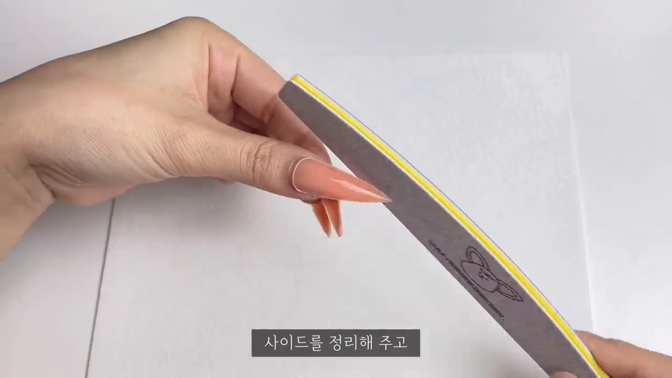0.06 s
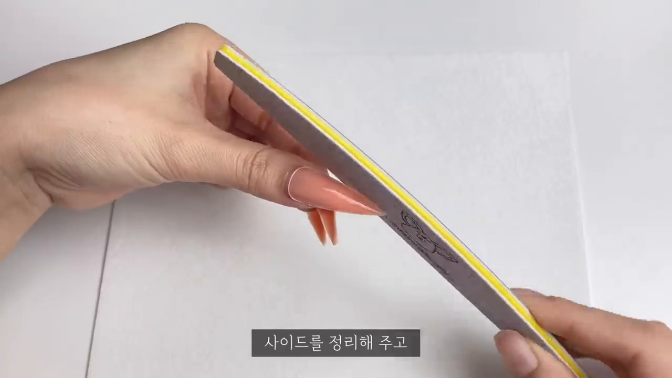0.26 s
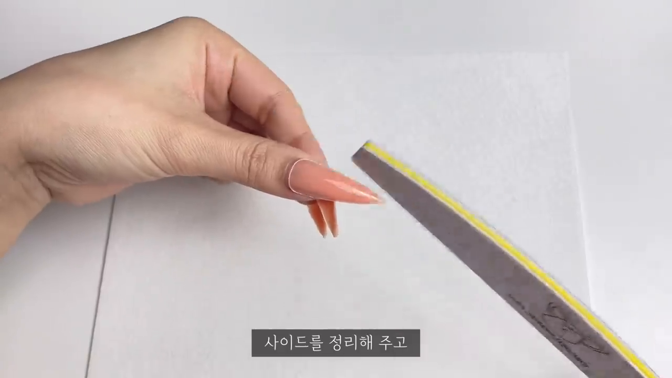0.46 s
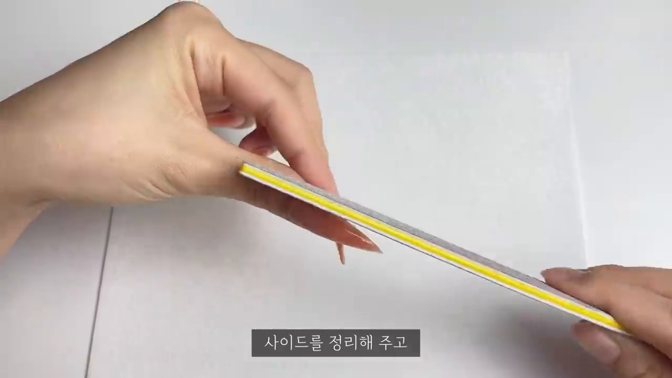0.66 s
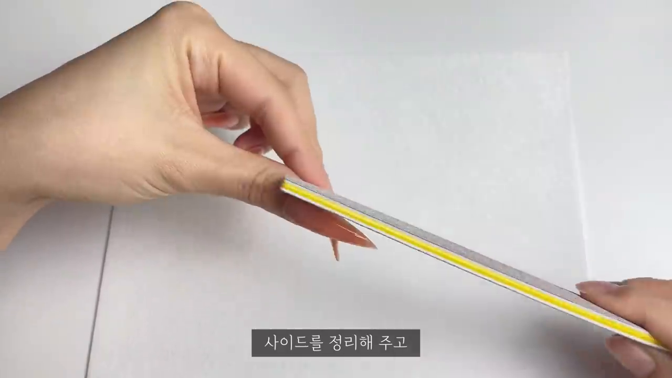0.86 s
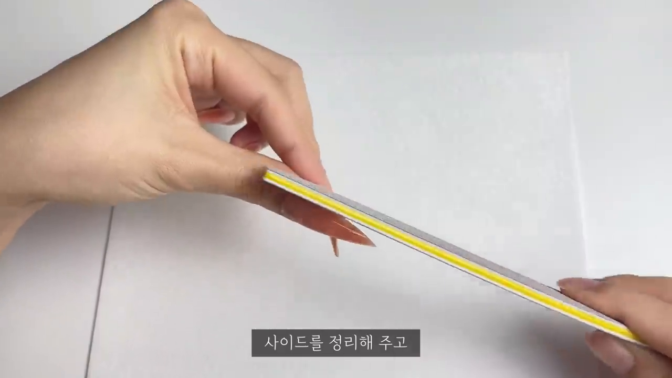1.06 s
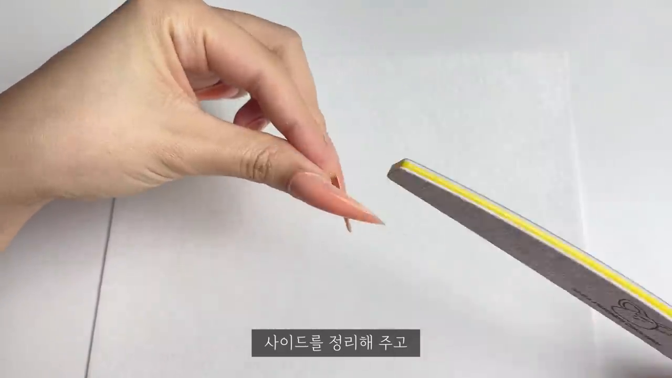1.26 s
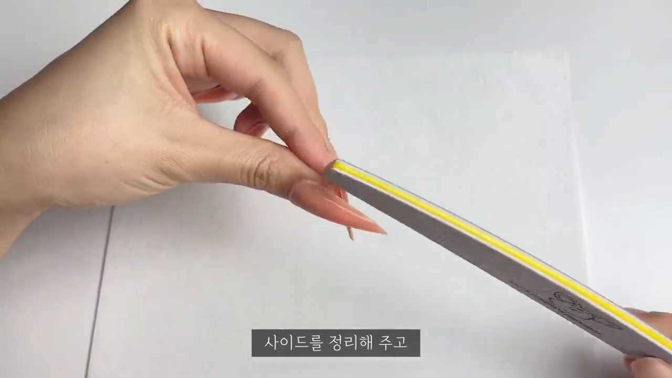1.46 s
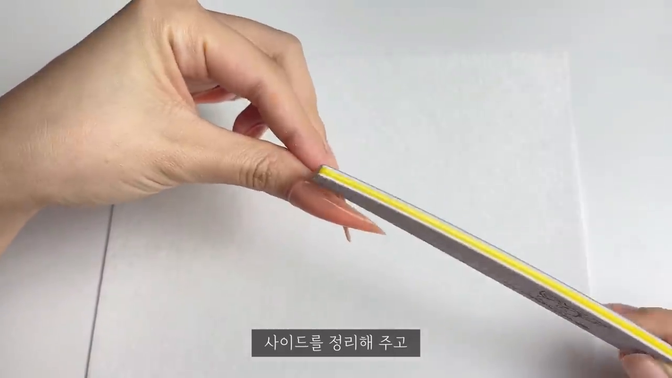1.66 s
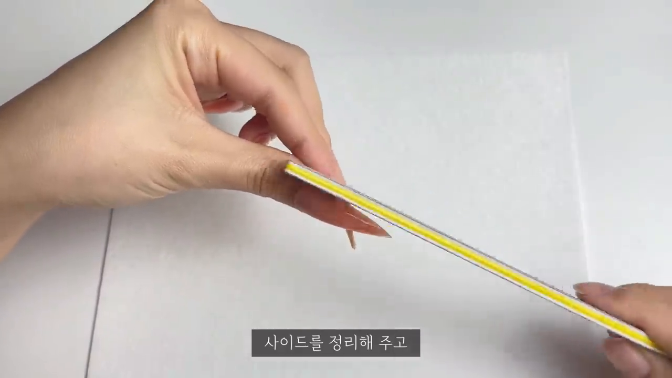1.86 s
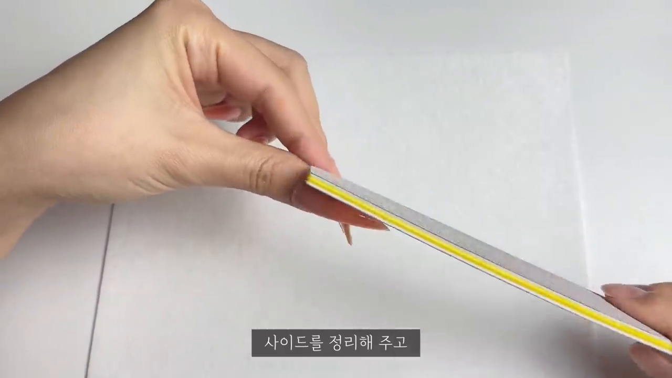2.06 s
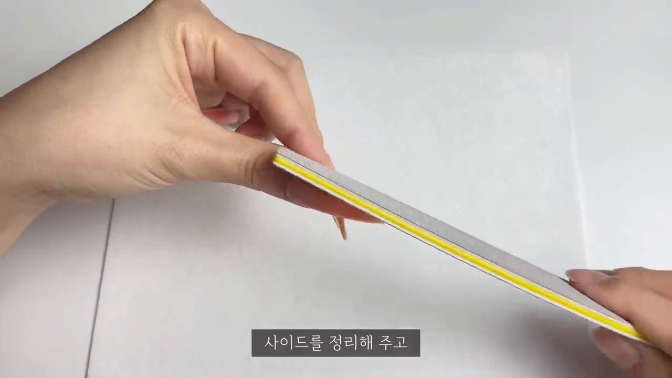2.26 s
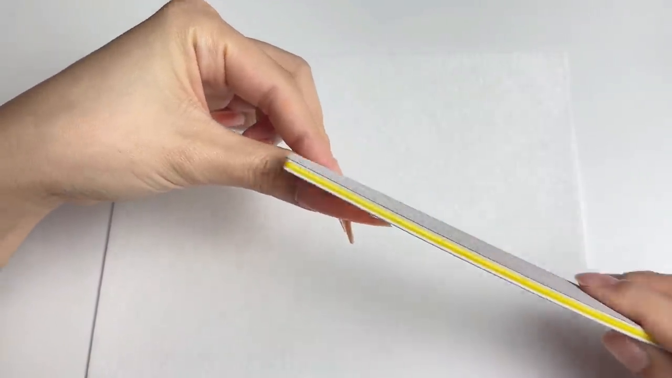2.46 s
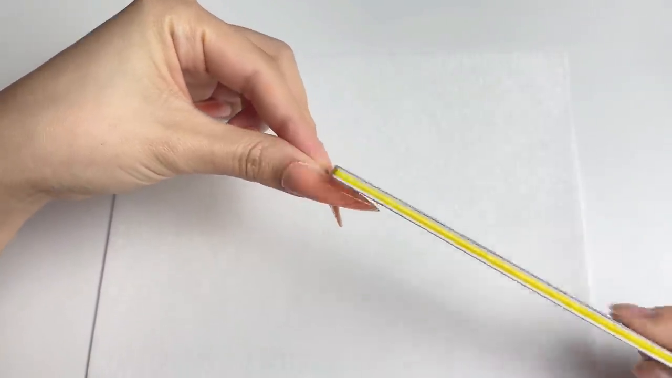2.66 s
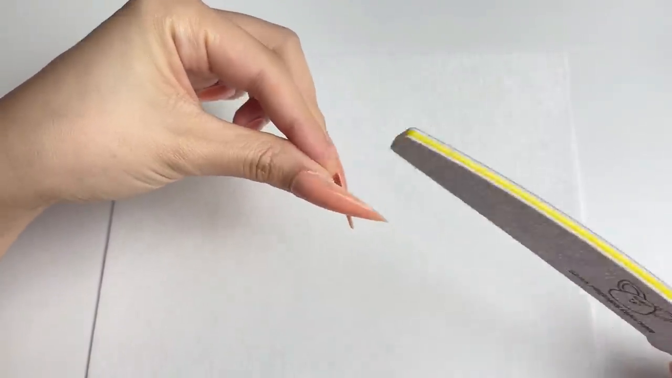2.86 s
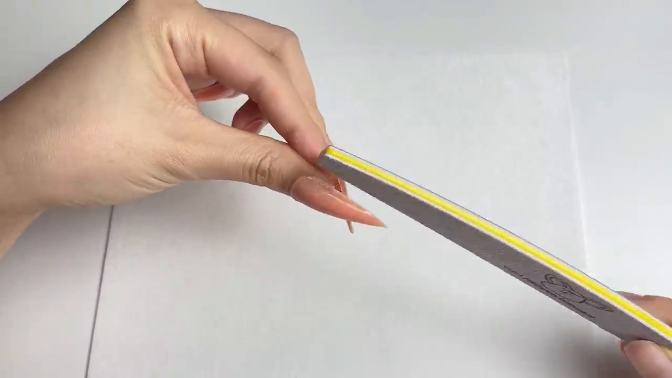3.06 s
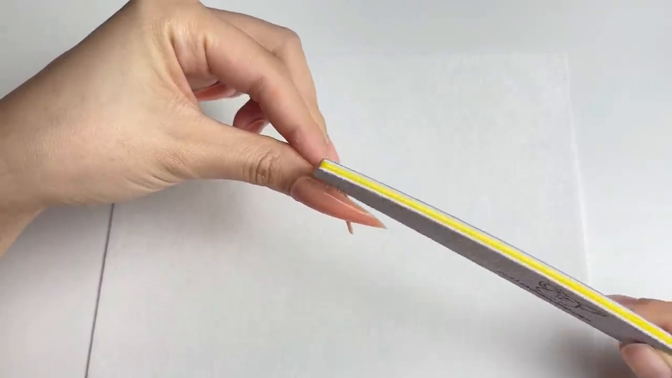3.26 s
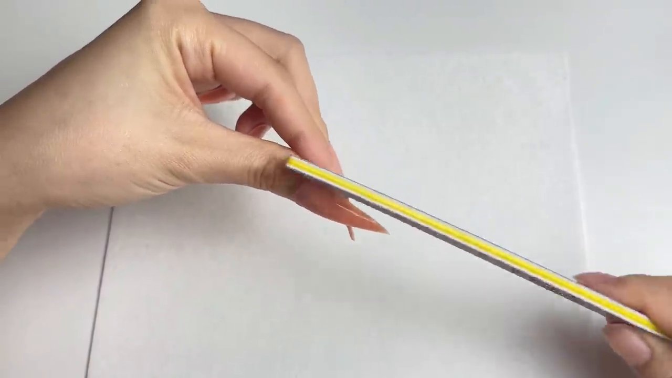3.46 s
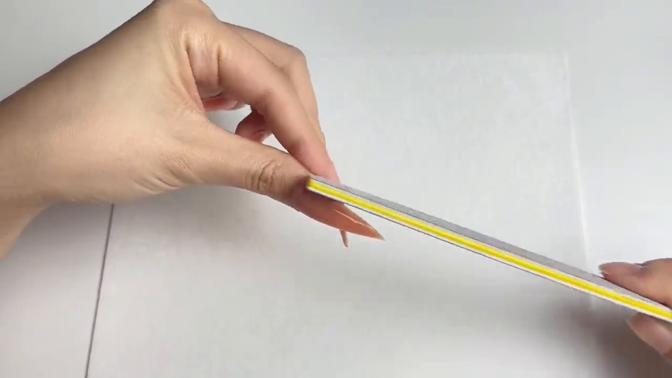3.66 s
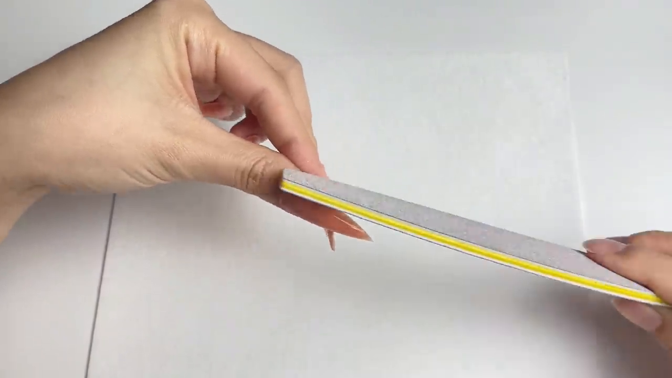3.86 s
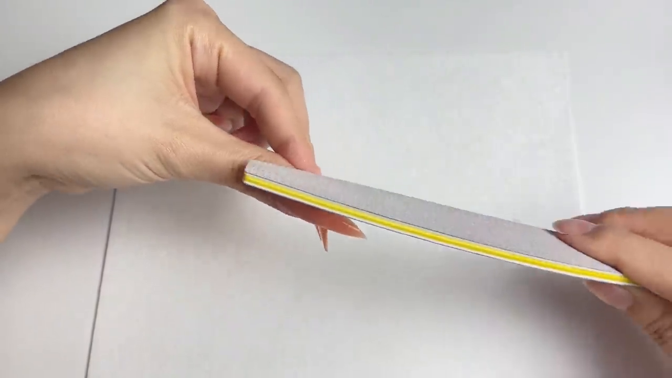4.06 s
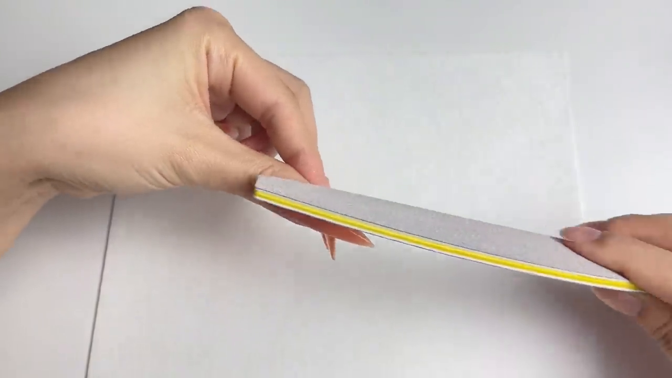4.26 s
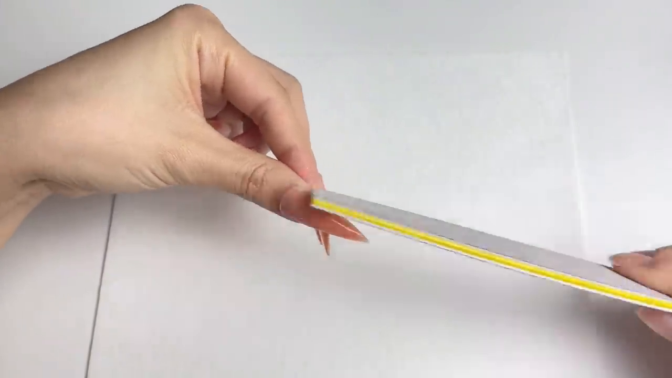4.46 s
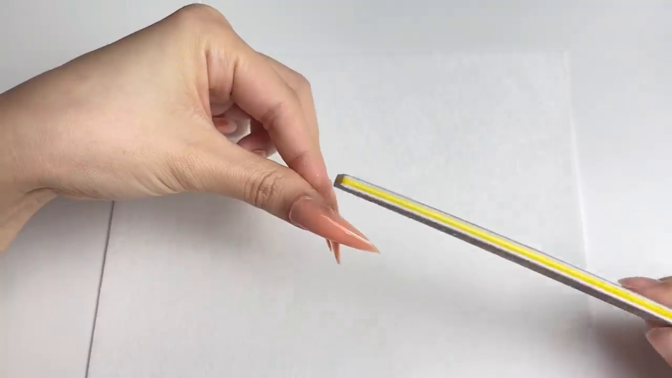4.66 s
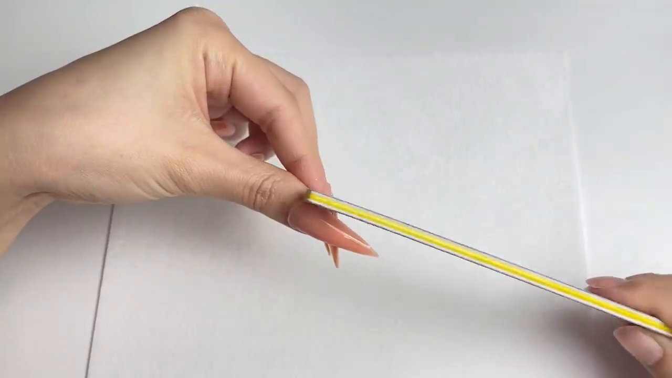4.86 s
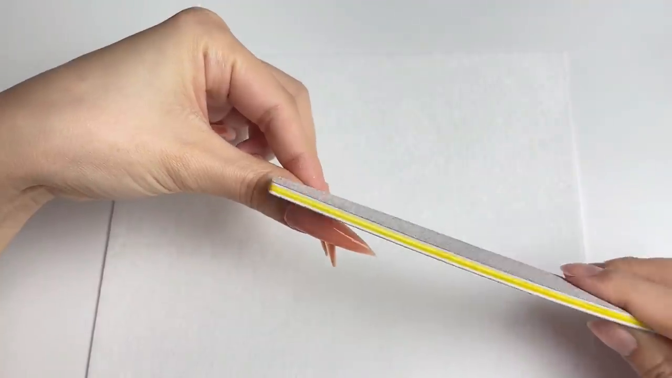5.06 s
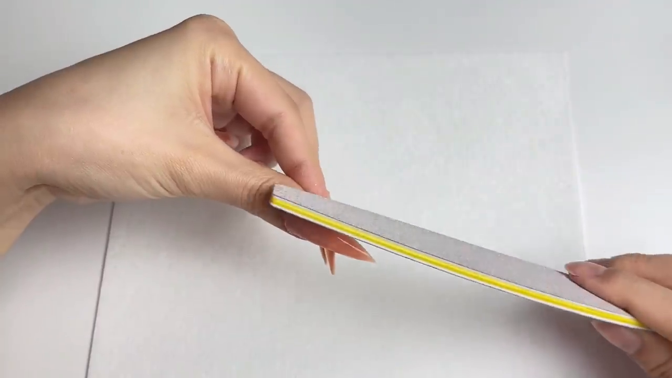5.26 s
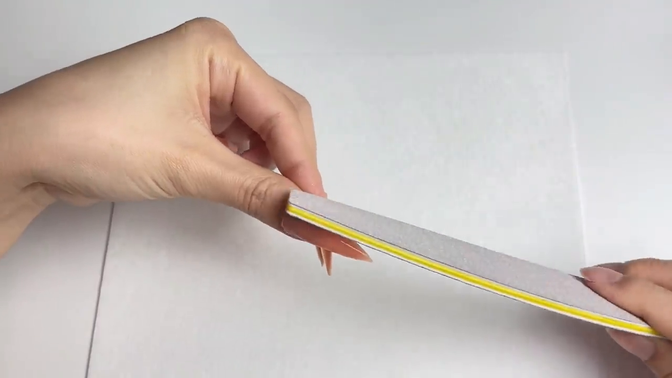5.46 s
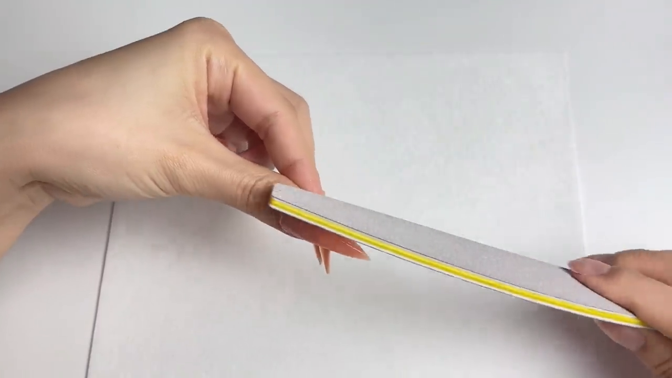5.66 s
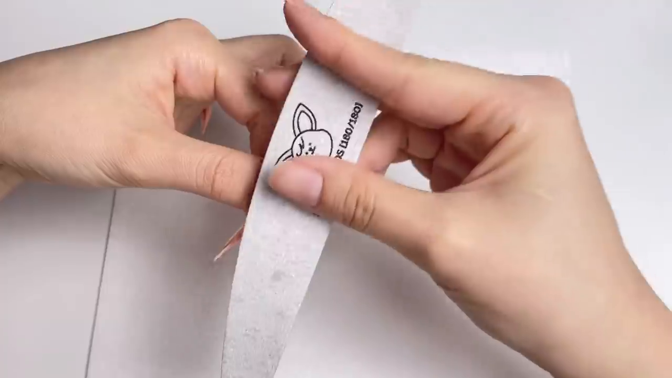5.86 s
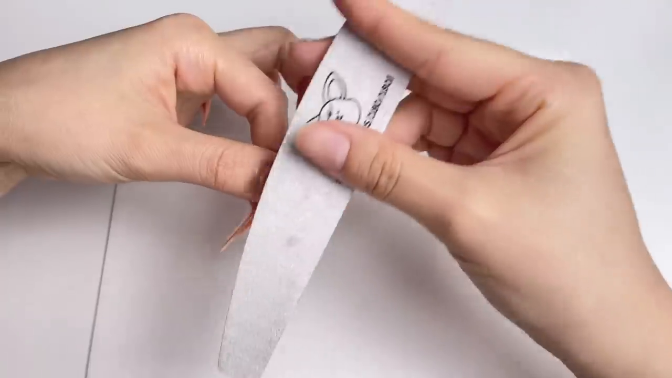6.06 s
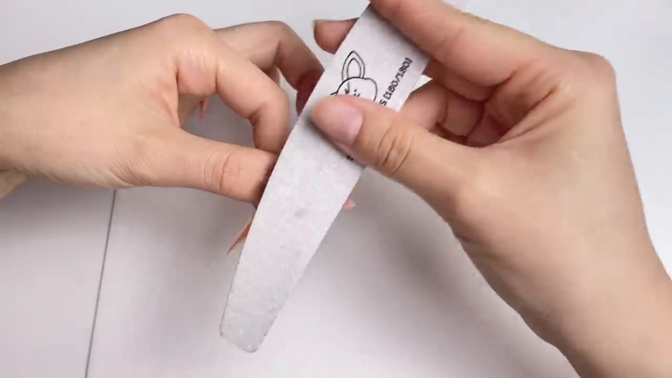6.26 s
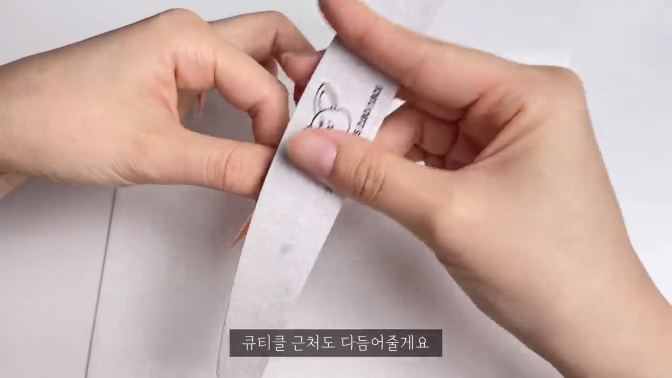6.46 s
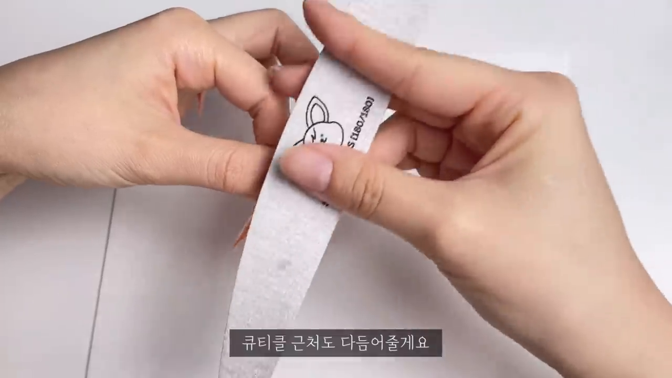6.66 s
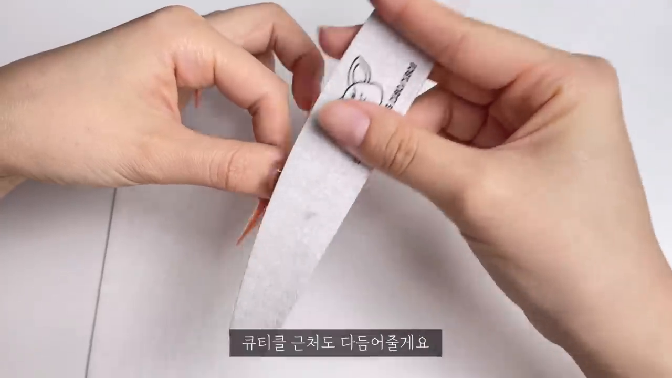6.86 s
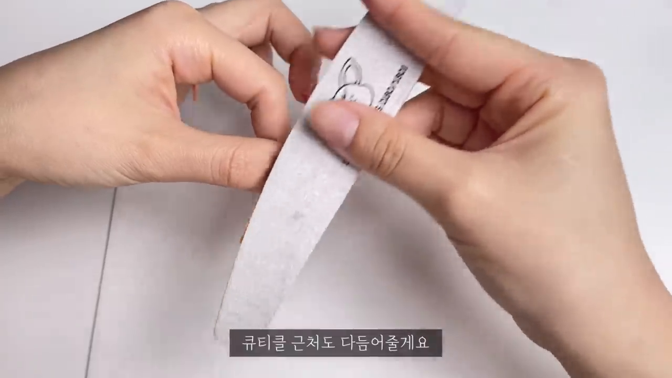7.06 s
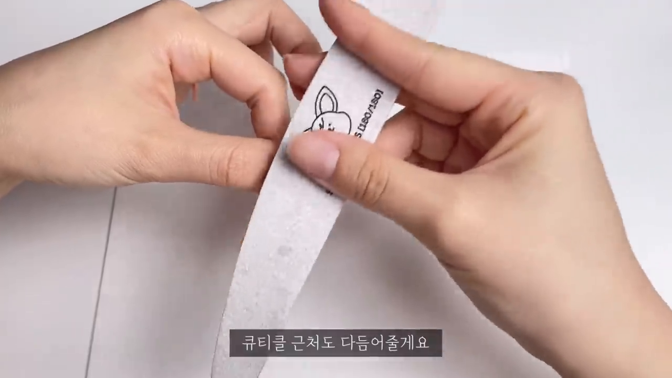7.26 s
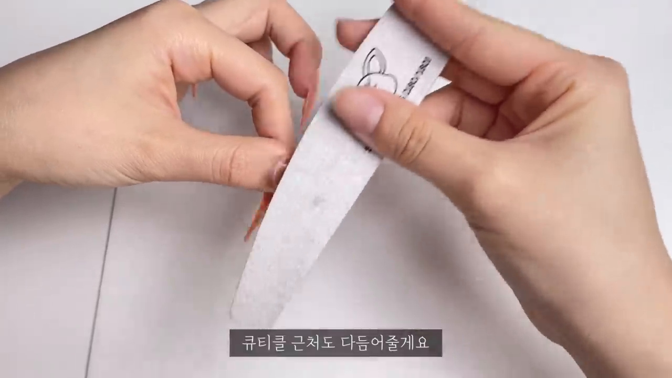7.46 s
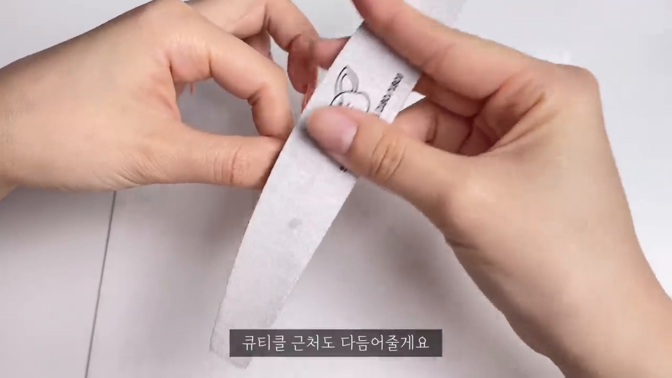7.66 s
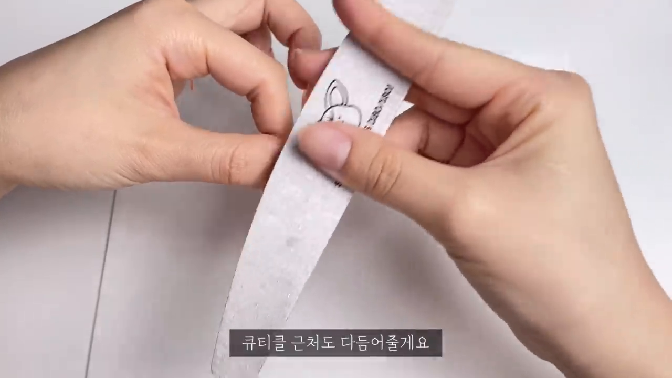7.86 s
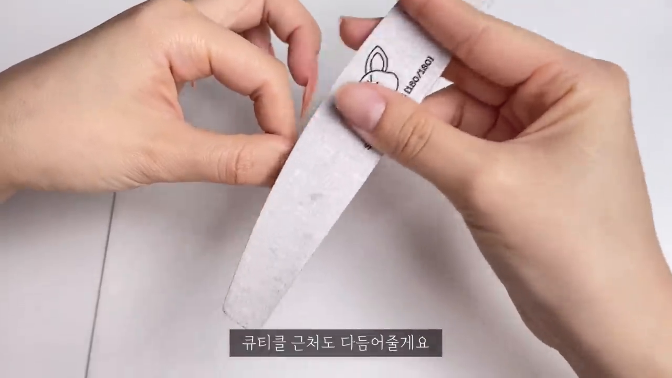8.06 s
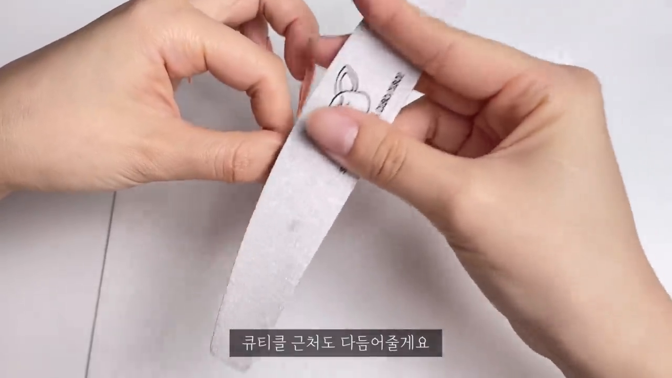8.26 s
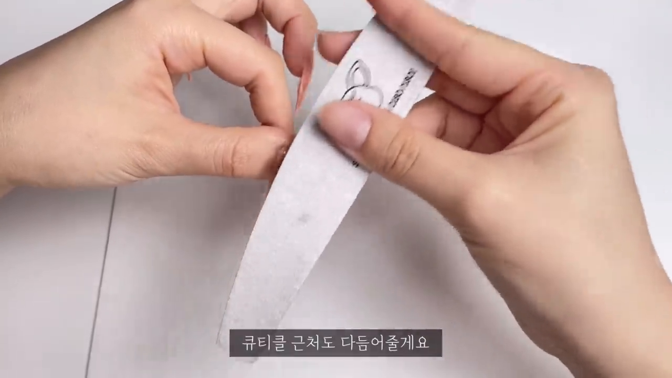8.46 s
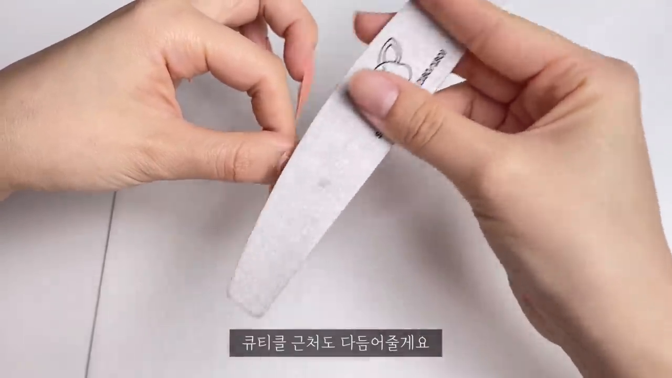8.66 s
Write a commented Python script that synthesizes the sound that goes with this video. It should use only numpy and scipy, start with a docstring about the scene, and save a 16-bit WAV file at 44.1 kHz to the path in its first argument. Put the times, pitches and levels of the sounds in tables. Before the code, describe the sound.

A hand file rasps a long plastic nail in quick, uneven strokes, then steadier ones with small taps, over a low room hum.

```python
"""Filing a long plastic nail

A hand file rasps a nail in a quiet, humming room: strokes along one edge, then the other edge, then
the flat of the file over the nail's root, landing with small taps. The grit's many tiny blows make
file and nail ring. Now and then the file slips off the nail's tip, which springs back with a flick."""
import sys
import numpy as np
from scipy import signal
from scipy.fft import rfft, irfft, next_fast_len
from scipy.io import wavfile
from scipy.ndimage import map_coordinates

SR = 44100
rng = np.random.default_rng(int(sys.argv[2]) if len(sys.argv) > 2 else 0)


def log_audio(samples):
    """Write samples as a 16-bit WAV file to the path given in sys.argv[1]."""
    # one column per channel
    frames = np.atleast_2d(samples).T
    # limit to full scale, then quantise
    limited = np.clip(frames, -1, 1)
    pcm = np.round(limited * 32767).astype(np.int16)
    wavfile.write(sys.argv[1], SR, pcm)


N = 383669

# Modes (ringing tones) of the file lying flat on the nail's root; the last row is a thin, high
# microphone peak: (pitch [Hz], width [Hz], level [dB])
ROOT_MODES = [(278, 340, -24), (580, 290, -5), (1074, 510, -0.5), (1580, 2400, -6.5), (2690, 420, 4),
              (3034, 340, 5), (3440, 560, 2), (4080, 770, -0.5), (4680, 640, 0.5), (5270, 490, 6),
              (6360, 790, -12.5), (7700, 2500, -7.5), (9400, 1200, -35), (9770, 1000, -12),
              (10900, 680, -12.5), (12260, 2100, -12.5), (14800, 1100, -5.5), (15600, 500, -14)]
# The file slips off the tip:
# (time [s], level [dB], length [s], tip pitch [Hz], dip in the grit just before [dB])
FLICKS = [(1.135, -36, 0.04, 1120, -4.5), (2.68, -34, 0.015, 1240, -2), (5.728, -28, 0.0083, 1220, -2.5)]


def amp(db):
    """Turn decibels into a factor to multiply by."""
    return 10 ** (np.asarray(db) / 20)


def unit(x):
    """Scale a sound to an average power of one."""
    return x / np.sqrt(np.mean(x ** 2) + 1e-20)


def along(points, hz):
    """Read between (frequency, value) points on a log frequency axis."""
    freqs, values = np.transpose(points)
    return np.interp(np.log(hz + 1), np.log(freqs + 1), values)


def wobble(rate):
    """A smooth random curve through `rate` points a second."""
    return map_coordinates(rng.standard_normal(int(N * rate / SR) + 4), [np.arange(N) * rate / SR])


def filtered(x, response):
    """Scale each frequency of x by response(hz)."""
    size = next_fast_len(N + SR // 2)
    return irfft(rfft(x, size) * response(np.fft.rfftfreq(size, 1 / SR)), size)[..., :N]


def ringing(modes, scatter_db, hz):
    """How fading modes answer a blow; where the file touches changes each one's strength."""
    power = sum(amp(2 * (db + scatter_db * rng.standard_normal()))
                / (1 + (2 * (hz - pitch) / width) ** 2) ** 2 for pitch, width, db in modes)
    radiated = hz ** 4 / (hz ** 4 + 180 ** 4)  # a small object moves little air in the bass
    cepstrum = irfft(np.log(power * radiated + 1e-9) / 2)
    half = len(hz) - 1
    cepstrum[1:half] *= 2  # this fold puts the ringing after the blow, never before
    cepstrum[half + 1:] = 0
    return np.exp(rfft(cepstrum))


def bands(response, hz):
    """Cut a response into low, middle, upper and top bands of equal power."""
    below = [1 / (1 + (hz / (edge_hz + 1)) ** 24) for edge_hz in (0, 1900, 5900, 9000, 16000)]
    pieces = np.diff(below, axis=0) * response
    return pieces / np.sqrt(np.mean(np.abs(pieces) ** 2, axis=1, keepdims=True))


def room_tone():
    """The room hums: a deep and a higher rumble waver under a smooth hiss."""
    # Loudness of the higher rumble, before its waver: (time [s], level [dB])
    hum_levels = [(0.0, -55), (0.09, -43.5), (0.58, -53.5), (0.63, -47.5), (1.04, -54), (1.09, -47),
                  (1.16, -53.5), (1.87, -48), (1.89, -57), (1.99, -47), (2.06, -51.5), (2.23, -48),
                  (3.03, -55.5), (3.17, -51.5), (3.51, -55.5), (4.26, -49.5), (4.72, -53.5), (8.7, -53.5)]
    # Tone of the rumble: (frequency [Hz], relative level [dB])
    rumble_shape = [(15, -70), (25, -59), (40, -24), (57, 0.5), (71, -0.5), (96, -2.5), (128, -2),
                    (153, -3), (172, -8), (202, -7), (317, -11), (442, -19.5), (600, -30.5), (780, -72),
                    (1320, -120)]
    # Tone of the hiss: (frequency [Hz], relative level [dB])
    hiss_shape = [(240, -22), (400, -1.5), (763, -6.5), (1230, -11), (1290, -10), (1810, -12.5),
                  (2530, -15), (3140, -16.5), (3390, -16), (10300, -23.5), (15800, -37)]

    def noise(shape, share):
        return unit(filtered(rng.standard_normal(N), lambda hz: amp(along(shape, hz)) * share(hz) ** .5))

    upper_share = lambda hz: hz ** 6 / (hz ** 6 + 105 ** 6)
    deep = noise(rumble_shape, lambda hz: 1 - upper_share(hz))
    upper = noise(rumble_shape, upper_share)
    hiss = noise(hiss_shape, lambda hz: 1)
    upper_db = np.interp(np.arange(N) / SR, *np.transpose(hum_levels)) + 1.5 * wobble(7.3)
    deep_db = -59 + 1.5 * wobble(7.7)
    return amp(deep_db) * deep + amp(upper_db) * upper + amp(-57) * hiss


def wall_echo(x):
    """The walls answer a sound; each frequency dies away at its own speed."""
    # How long the room rings: (frequency [Hz], time to fade by 60 dB [s])
    fade_times = [(500, 0.048), (3000, 0.2), (12000, 0.16)]
    hz, t, noise = signal.stft(rng.standard_normal(SR // 2), SR, nperseg=256)
    tail = signal.istft(noise * amp(-60 * t / along(fade_times, hz)[:, None]), SR, nperseg=256)[1]
    return signal.fftconvolve(np.pad(x, (200, 0)), tail / np.linalg.norm(tail))[:N]


def near_echoes(hz, level_db, fade_s):
    """Direct sound plus weak, bright echoes off fingers and desk, new for each position of the hands."""
    t = np.arange(SR // 50) / SR
    spray = amp(-60 * t / fade_s) * rng.standard_normal(len(t))
    bright = hz ** 2 / (hz ** 2 + 5000 ** 2)
    return 1 + amp(level_db) * bright * rfft(spray / np.linalg.norm(spray), 2 * len(hz) - 2)


def taps():
    """The flat file lands: a soft push knocks its low modes and the contact chatters in the middle ones."""
    # Landings on the nail: (time [s], relative level [dB], change to the knock alone [dB])
    landings = [(5.879, -36, 2.5), (6.1708, -36, 5), (6.4153, -51, 7), (6.7048, -34, -11),
                (7.2851, -40.5, 9), (8.2038, -43, 0), (8.5504, -25.5, -4)]
    out, size, lead = np.zeros(N + SR), 2048, 64
    hz, t = np.fft.rfftfreq(size, 1 / SR), np.arange(size) / SR
    delay = np.exp(-2j * np.pi * hz * lead / SR)
    for time, db, knock_db in landings:
        low, middle = bands(ringing(ROOT_MODES, scatter_db=2.5, hz=hz), hz)[:2]
        knock = low / (1 + 1j * hz / 800) ** 2
        knock *= np.exp(-2j * np.pi * hz * 0.0014)  # the body follows the first touch
        burst = amp(-10.5 - 60 * t / 0.012) * rng.standard_normal(size)
        chatter = middle * rfft(burst) / (1 + 1j * hz / 4500)
        tap = amp(db + 7.5) * (amp(knock_db + 19) * knock + chatter)
        out[round(time * SR) - lead:][:size] += irfft(delay * tap)
    return out[:N]


def flicks():
    """The freed nail tip springs back at once and shudders briefly at its own low pitch."""
    tip_width_hz, floor_hz = 520, 750
    out, size = np.zeros(N + SR), 4096
    hz, t = np.fft.rfftfreq(size, 1 / SR), np.arange(size) / SR
    radiated = (1j * hz / (floor_hz + 1j * hz)) ** 3  # the thin tip moves little air in the bass
    for time, db, length, tip_hz, _ in FLICKS:
        shake = rng.standard_normal(size) * np.clip(3 * (1 - t / length), 0, 1)
        tip = bands(ringing([(tip_hz, tip_width_hz, 0)], scatter_db=0, hz=hz), hz)[0]
        shudder = irfft(rfft(shake) * tip * radiated)
        out[int(time * SR):][:size] += amp(db) * unit(shudder) * (length * SR / size) ** .5
    return out[:N]


def grit(grains_per_s, spread_db, swell_db, clump_db, bite_s, slack_s):
    """The force of grains striking at random: a few are big, and they bunch where the grit grips harder."""
    # The grit bites for a moment: (time [s], change in force [dB])
    bites = [(.084, 7), (.117, 1), (.133, -0.5), (.269, 3), (.326, 5), (.354, -1), (.373, -1), (0.643, 6),
             (.917, 3), (1.112, 4), (2.649, -2), (2.665, -0.5), (5.424, -2), (5.687, 6.5), (4.036, 10),
             (4.224, 11.5), (4.264, 4.5), (4.305, 5), (4.407, 10.5), (4.433, 3), (4.45, 9), (4.474, 11.5),
             (5.099, 4), (5.982, 3), (6.257, 8), (6.469, 6.5), (6.503, 4), (6.528, 10.5), (6.544, 10),
             (7.415, 6), (7.678, 3), (7.966, 0), (8.016, 1), (8.636, 6), (8.664, 5.5), (8.677, 7)]
    t = np.arange(N) / SR
    strikes = rng.random(N) < grains_per_s / SR
    sizes = amp(spread_db * rng.exponential(size=N)) * rng.standard_normal(N)
    bunching = amp(swell_db * wobble(45) + clump_db * wobble(220))
    force = unit(strikes * sizes * bunching)
    for time, db in bites:
        near = slice(int((time - .01) * SR), int((time + .01) * SR))
        force[near] *= amp(db * np.exp(-((t[near] - time) / bite_s) ** 2))
    for time, *_, slack_db in FLICKS:
        force[int((time - slack_s) * SR):int(time * SR)] *= amp(slack_db)
    return force


def filing(force):
    """Stroke by stroke, the grit rings file and nail; a faster file is louder and brighter."""
    # Modes of file and nail along each edge; the last row of each table is a thin, high
    # microphone peak: (pitch [Hz], width [Hz], level [dB])
    first_edge_modes = [(244, 81, -12), (790, 260, -30), (1265, 590, 17), (2060, 490, -6), (2630, 750, 7.5),
                        (3270, 490, 8.5), (3950, 1600, 8.5), (5270, 660, 7), (5900, 1100, 5.5),
                        (6980, 700, -2), (7670, 860, 5), (8700, 830, -1.5), (9850, 1500, -1.5),
                        (11600, 1500, -3.5), (13800, 1500, -5), (15800, 660, 5)]
    other_edge_modes = [(886, 200, 3), (1390, 380, 17), (2170, 270, 6.5), (2700, 1440, 7),
                        (3140, 360, 12.5), (3490, 750, 14.5), (4540, 510, 17.5), (4960, 760, 7.5),
                        (5660, 840, 8.5), (6910, 1100, 2.5), (7890, 2100, 2.5), (8750, 490, -5.5),
                        (9460, 480, -4.5), (10240, 660, -4.5), (11200, 1500, -6), (12150, 1600, -9.5),
                        (13500, 1500, -5.5), (15200, 1000, -8.5), (15160, 560, 0)]
    # Strokes of the file: (start [s], rise [s], hold [s], fall [s], rasp level [dB],
    # swell over the hold [dB], low band [dB], upper band [dB], top band [dB], low drift [dB],
    # treble drift [dB]). Bands count from the rasp level; a drift is the change from start to end.
    strokes = [(-0.02, 0.055, 0.097, 0.084, -37.5, 12.0, -8.4, -2.5, -1.8, 0, 3),
               (0.192, 0.098, 0.095, 0.081, -26.0, -1.5, -12, -1.2, -1.5, -3, 4),
               (0.568, 0.028, 0.072, 0.036, -45.5, 8, -11.9, -1, -3, 11.6, 4.5),
               (0.707, 0.034, 0.076, 0.038, -37.5, 1.1, -9, -4.5, -5.9, -4, 0),
               (0.841, 0.056, 0.065, 0.017, -38, -0.5, -14.5, -0.8, -2, 19, -1.3),
               (0.961, 0.095, 0.094, 0.043, -35.5, 0, -9.7, -2.6, -3.5, -9, 9),
               (1.74, 0.065, 0.054, 0.047, -57.1, 9, -15, -3.5, -5, 6.3, -4.1),
               (1.967, 0.048, 0.038, 0.029, -43.5, -1.3, -8, -4, -5.5, 1.2, -0.7),
               (2.1, 0.03, 0.046, 0.06, -42.6, 3, -11, -1.5, -5.0, 9, 0),
               (2.233, 0.026, 0.064, 0.057, -43, 10.5, -9, -3.5, -2.5, -1, 4),
               (2.358, 0.071, 0.061, 0.051, -37, -2.4, -9.5, -1.5, -2.9, 11, -1),
               (2.527, 0.081, 0.055, 0.076, -30, 2, -10, 0.5, -1, 14, 4),
               (3.348, 0.081, 0.042, 0.051, -53, -1, -14.2, -0.5, -1, -9.9, 7),
               (3.519, 0.044, 0.045, 0.041, -48.5, 2, -12.5, -1.5, -3, 6.3, 1.8),
               (3.633, 0.1, 0.024, 0.025, -42.5, -2.5, -11, -2, -2, -5.8, -2.4),
               (3.793, 0.045, 0.031, 0.053, -39, -5, -3.5, -5.5, -6.5, 10, -1.8),
               (3.908, 0.069, 0.055, 0.023, -42, -11.5, -7.2, -2.5, -4, -8, 1),
               (4.059, 0.068, 0.023, 0.05, -42.5, -3.5, -4, -1.5, -4.6, 0.9, 9.9),
               (4.183, 0.081, 0.047, 0.042, -36, -7.5, -7.5, 0.5, -0.2, 13.2, -6),
               (4.33, 0.033, 0.076, 0.065, -48.5, 8.5, -10, 3.1, 4.5, -4.3, -2),
               (4.889, 0.073, 0.028, 0.12, -53.5, -8.9, -12, -3, -2.7, 6.8, -6.0),
               (5.062, 0.05, 0.041, 0.034, -48, 5.5, -4.5, -4.5, -6, -2.2, 0),
               (5.195, 0.046, 0.049, 0.029, -43.5, -2.8, -11, -5.5, -4, -8.0, 2),
               (5.331, 0.06, 0.025, 0.051, -39.5, 2.2, -2.9, -4.5, -4.5, -4, 0),
               (5.452, 0.044, 0.031, 0.074, -39, 3.5, -8.5, -3, -2, 1, -1),
               (5.593, 0.085, 0.044, 0.032, -35, 4.5, -5, -0.9, -0.7, -4.5, 0),
               (5.883, 0.048, 0.049, 0.056, -31.5, -2.2, -4.5, -7.5, -10, -1.0, 10),
               (6.162, 0.043, 0.038, 0.065, -35.5, 4, -10, -6.5, -9, -19, 9.1),
               (6.444, 0.023, 0.063, 0.051, -33.5, -8, -9, -5, -8.5, -7, 11),
               (6.705, 0.039, 0.046, 0.058, -31, -1, -7.5, -6.5, -10.5, -2, 1),
               (7.001, 0.031, 0.057, 0.083, -36.5, 3, -6, -7, -12, 0, 3),
               (7.302, 0.023, 0.062, 0.081, -38.5, 5, -7.5, -5, -8, -10, 6),
               (7.618, 0.022, 0.067, 0.056, -37, 3.5, -4, -7.5, -11.5, 1.0, 11),
               (7.938, 0.015, 0.064, 0.076, -39.5, 7.5, -4, -8, -14.5, 3, 10),
               (8.24, 0.017, 0.069, 0.073, -39, 5.5, -6, -6.5, -8, -15.0, 14),
               (8.552, 0.015, 0.084, 0.058, -38.5, 2.9, -4.5, -8.5, -9, -7.0, 13.7)]
    other_edge_s, root_s = .52, 5.84  # the hand changes its grip
    speed_powers = (1.6, 2.01, 2.2, 2.3)  # how steeply each band, low to top, grows with speed
    nail_hz, note_fade_db_per_s, deepen_db_per_s = 4500, 1.1, 2.5
    out, size = np.zeros(N + SR), 2 ** 14
    hz = np.fft.rfftfreq(size, 1 / SR)
    for start, rise, hold, fall, rasp_db, swell_db, low_db, upper_db, top_db, *drifts_db in strokes:
        if start < other_edge_s:
            modes, grip_start = first_edge_modes, 0
        elif start < root_s:
            modes, grip_start = other_edge_modes, other_edge_s
        else:
            modes, grip_start = ROOT_MODES, root_s
        end = start + rise + hold + fall
        first = max(0, int(start * SR))
        grains = force[first:int(end * SR)]
        t = (first + np.arange(len(grains))) / SR
        speed = np.clip(np.minimum((t - start) / rise, (end - t) / fall), 0, 1)
        press_db = rasp_db + swell_db * np.clip((t - start - rise) / hold, 0, 1)
        low_drift, treble_drift = np.outer(drifts_db, (t - start) / (end - start) - .5)
        bands_db = (low_db + low_drift, 0, upper_db + treble_drift, top_db + treble_drift)
        levels = [amp(press_db + db) * speed ** power for db, power in zip(bands_db, speed_powers)]

        damping = amp(0.1 * (press_db.max() + 37))  # pressing harder shortens the ringing
        # The nail's own note stands out under a light touch and weakens as a grip goes on.
        note_db = 4.5 - note_fade_db_per_s * (start - grip_start) - 0.21 * (press_db.max() + 44.5)
        # The lowest modes grow as the flat file works along the root.
        deep_db = deepen_db_per_s * max(0, start - root_s)
        wander = .01 * (start > root_s)  # each root stroke meets a new spot, shifting the pitches
        touched = [(pitch * (1 + wander * rng.standard_normal()), width * damping,
                    db + note_db * (abs(pitch - nail_hz) < 250) + deep_db * (pitch < 800))
                   for pitch, width, db in modes]
        response = ringing(touched, scatter_db=1.2, hz=hz) * near_echoes(hz, level_db=-6, fade_s=0.044)
        rasp_bands = rfft(levels * grains, size) * bands(response, hz)
        out[first:first + size] += irfft(rasp_bands.sum(axis=0))
    return out[:N]


def scene():
    """Taps, flicks and filing with their echo, over the room's hum, in one channel."""
    force = grit(grains_per_s=18000, spread_db=1.25, swell_db=1.05, clump_db=1.17,
                 bite_s=0.0022, slack_s=.014)
    nail = taps() + flicks() + filing(force)
    return (nail + amp(-18.5) * wall_echo(nail) + room_tone())[None]


def record(dry):
    """The sound is cut off steeply above about 15.8 kHz."""
    top_hz = 15790
    return filtered(dry, lambda hz: 1 / (1 + np.exp(np.clip((hz - top_hz) / 22, -50, 50))))


dry = scene()
out = record(dry)
log_audio(out)
```